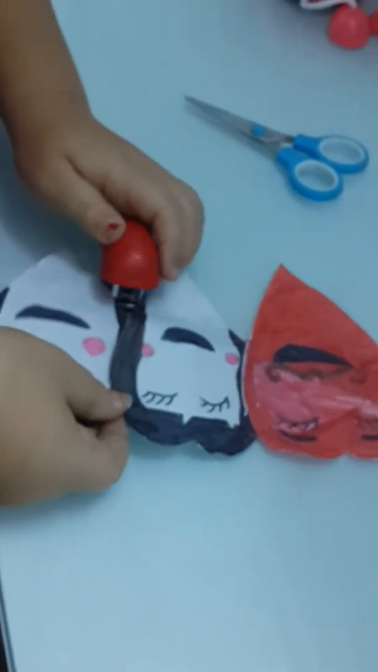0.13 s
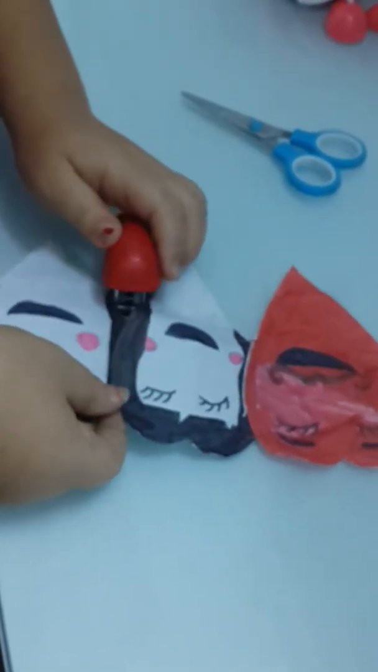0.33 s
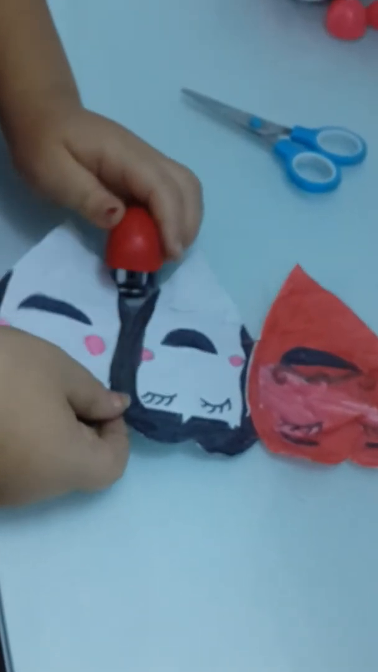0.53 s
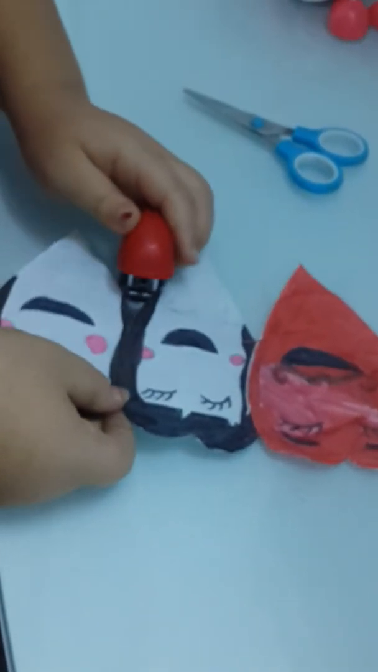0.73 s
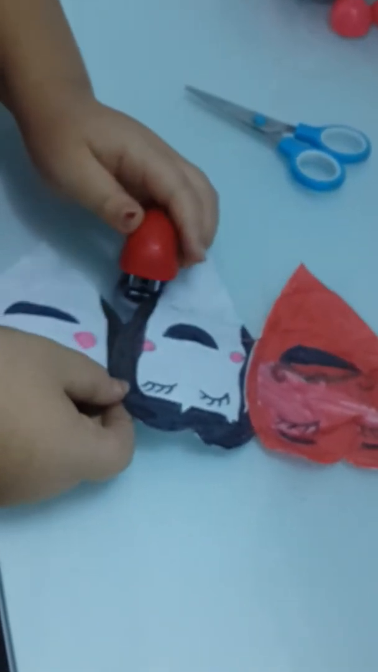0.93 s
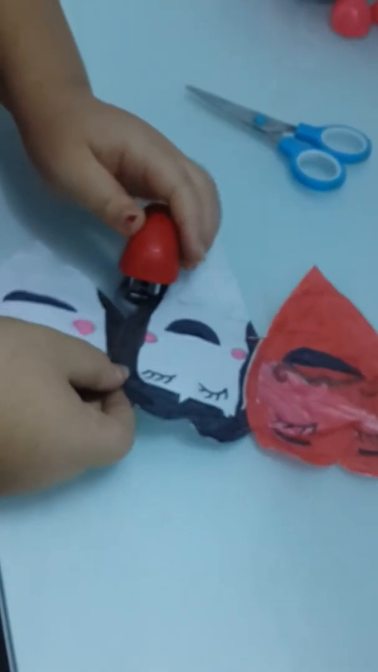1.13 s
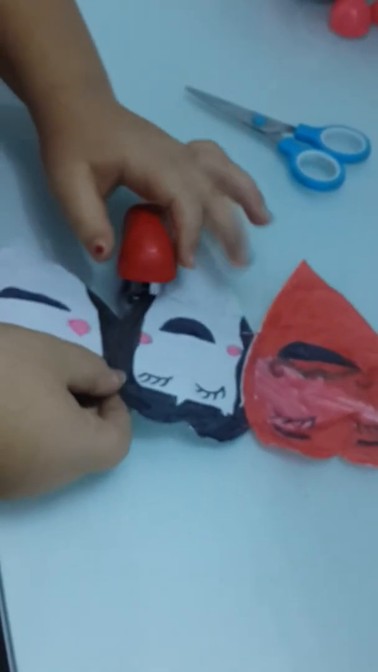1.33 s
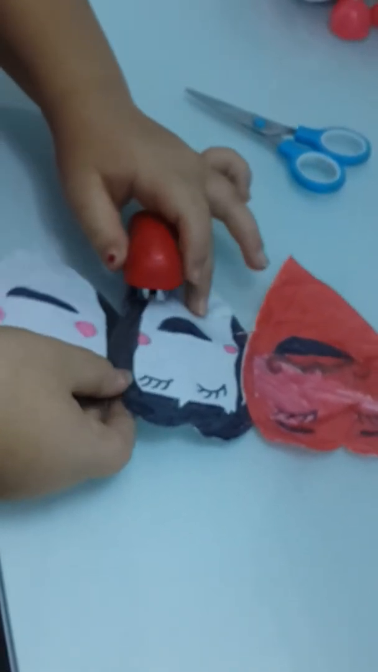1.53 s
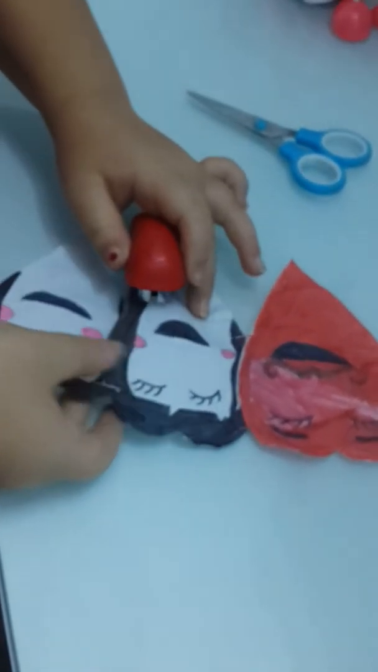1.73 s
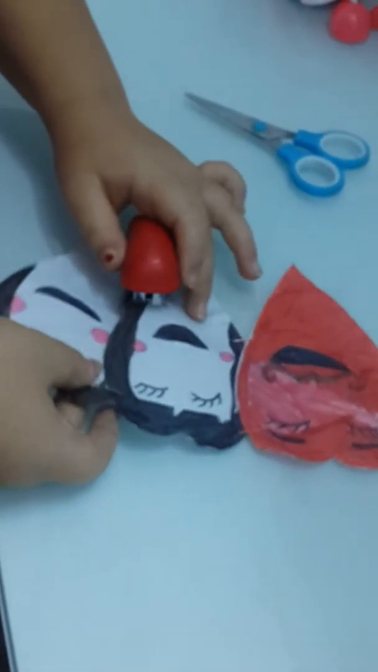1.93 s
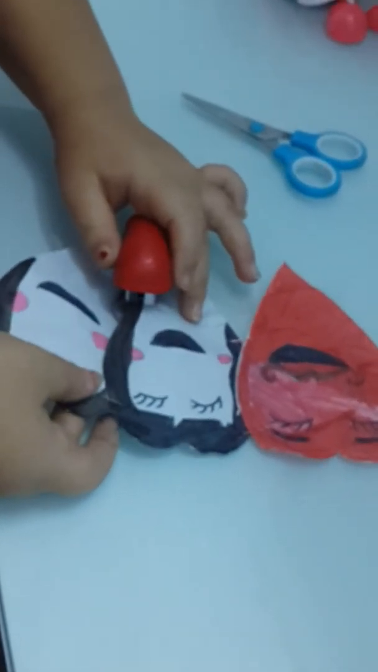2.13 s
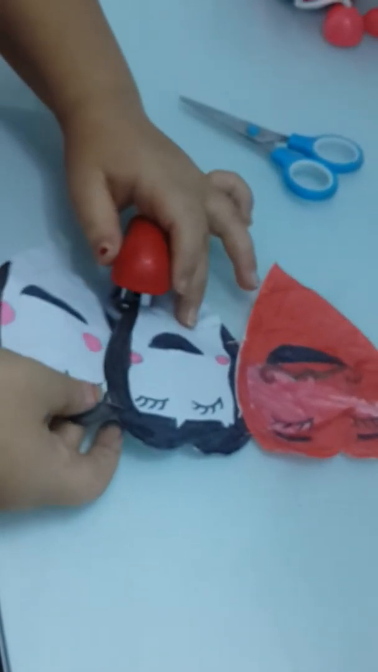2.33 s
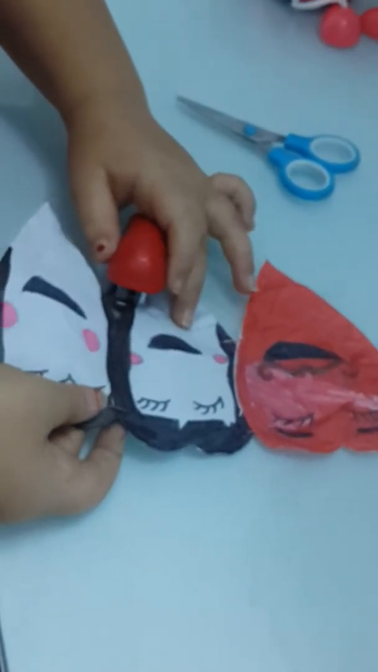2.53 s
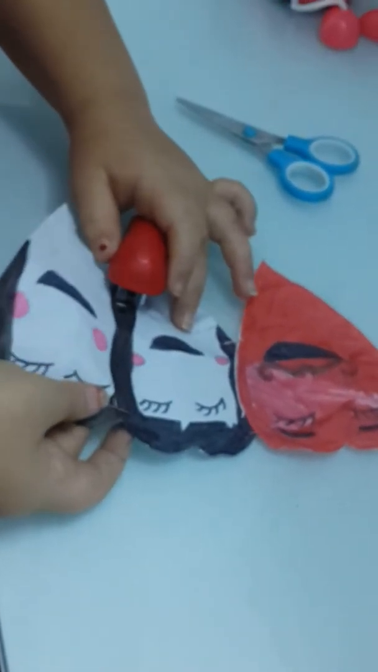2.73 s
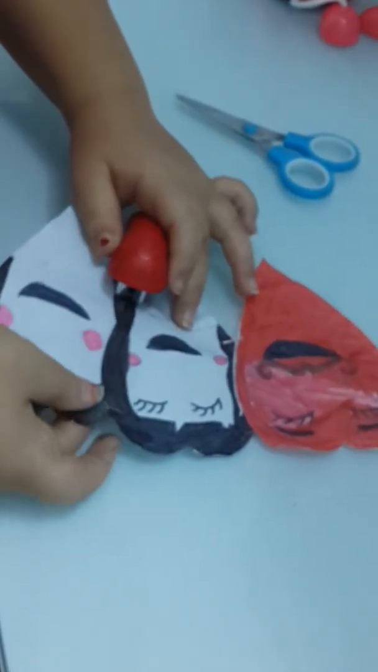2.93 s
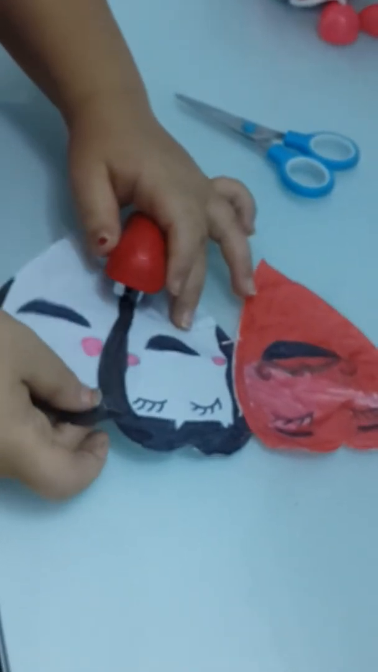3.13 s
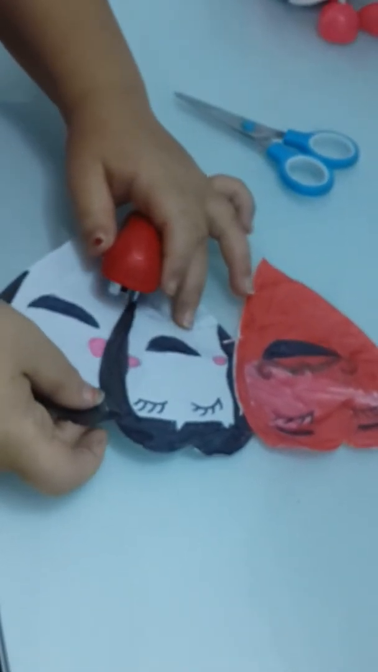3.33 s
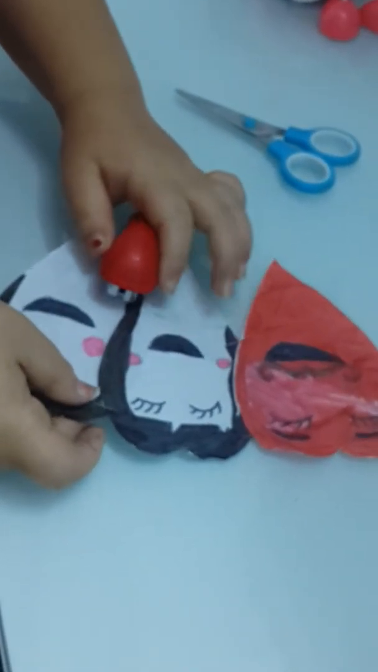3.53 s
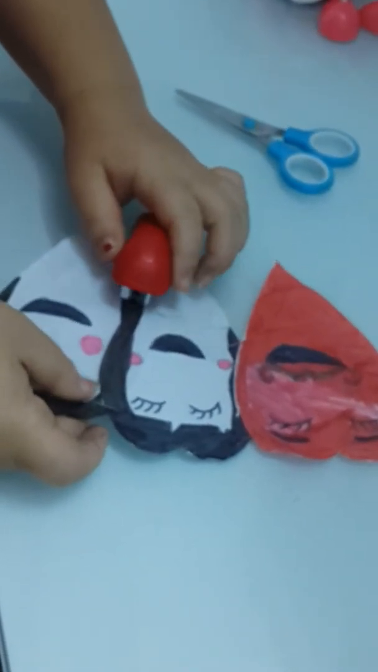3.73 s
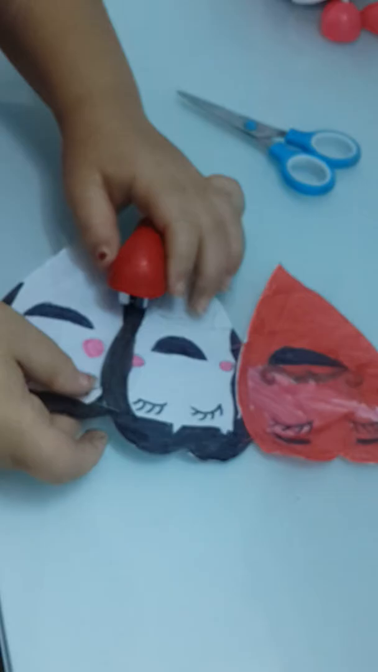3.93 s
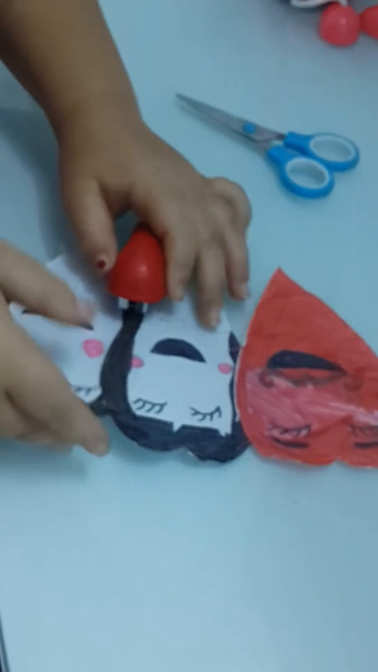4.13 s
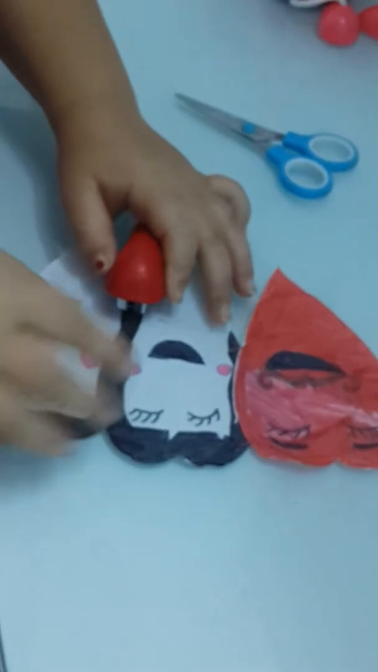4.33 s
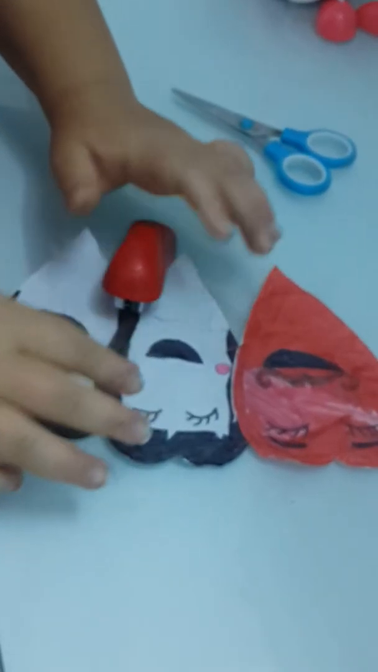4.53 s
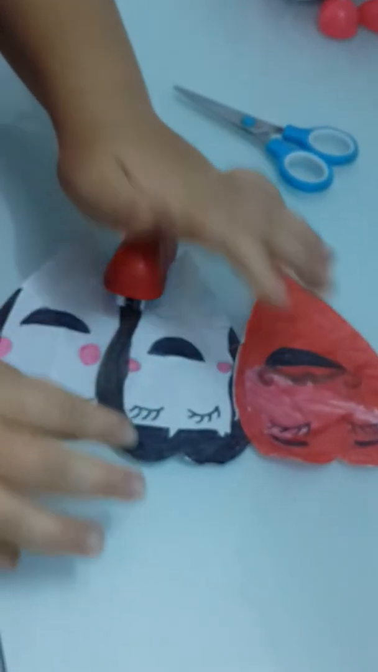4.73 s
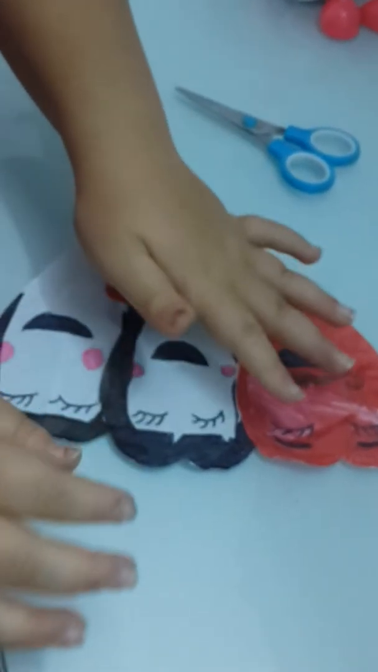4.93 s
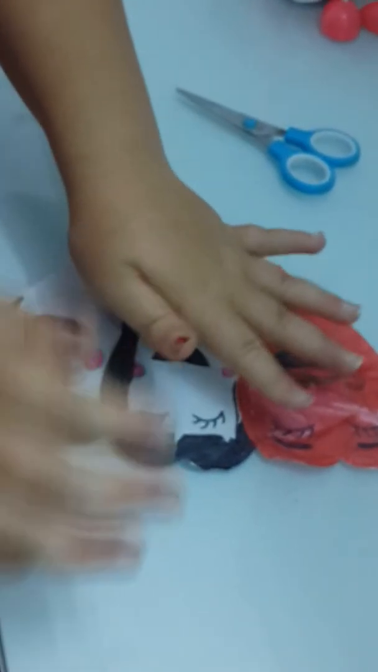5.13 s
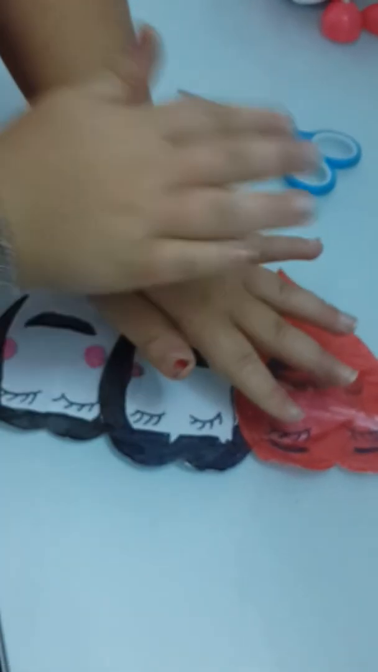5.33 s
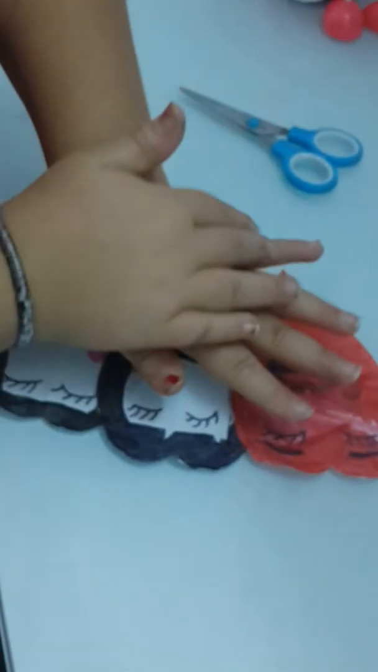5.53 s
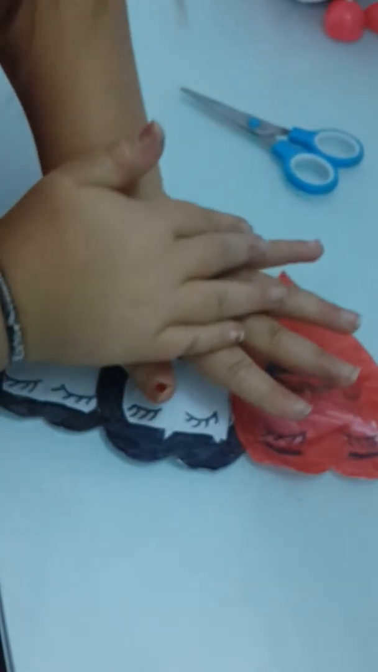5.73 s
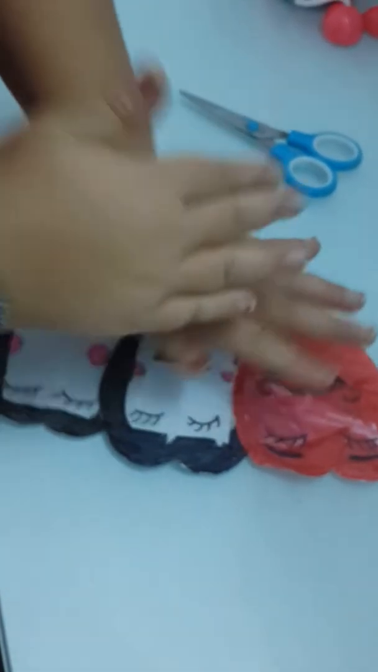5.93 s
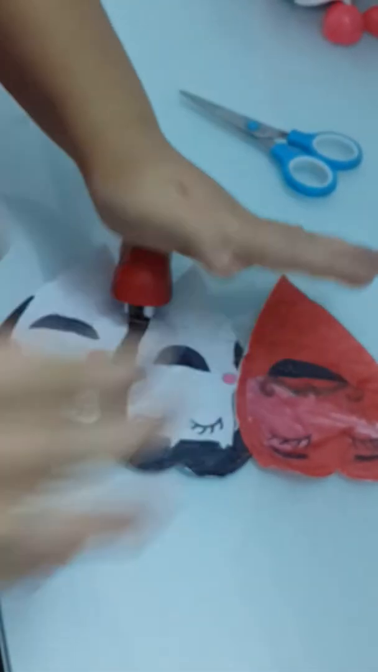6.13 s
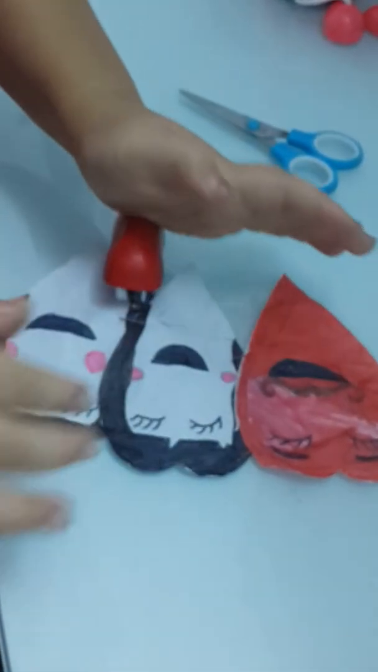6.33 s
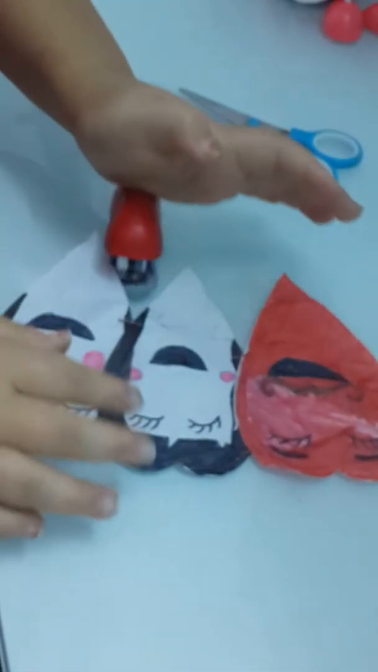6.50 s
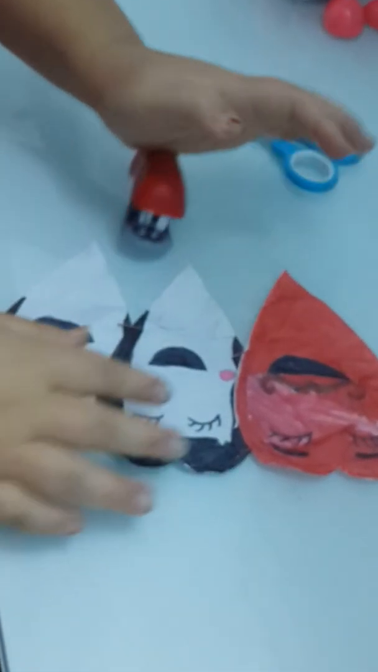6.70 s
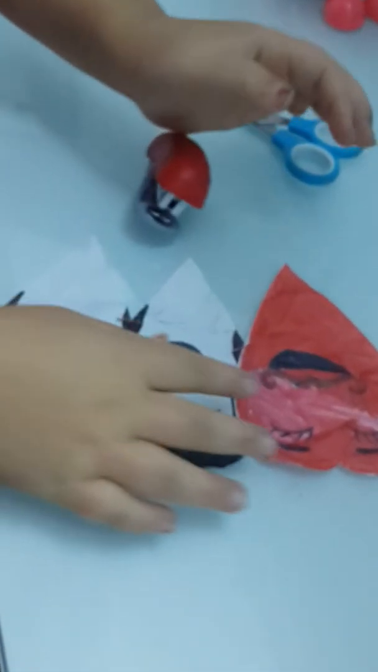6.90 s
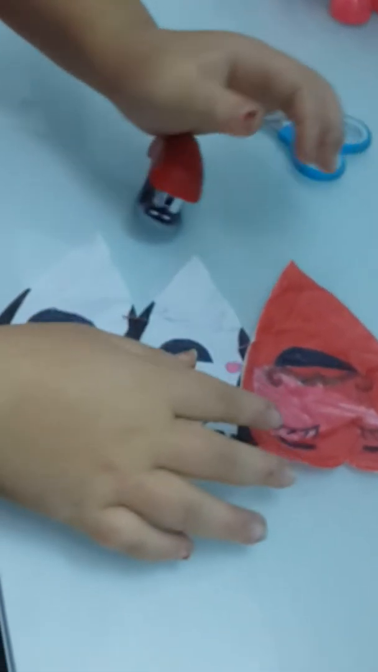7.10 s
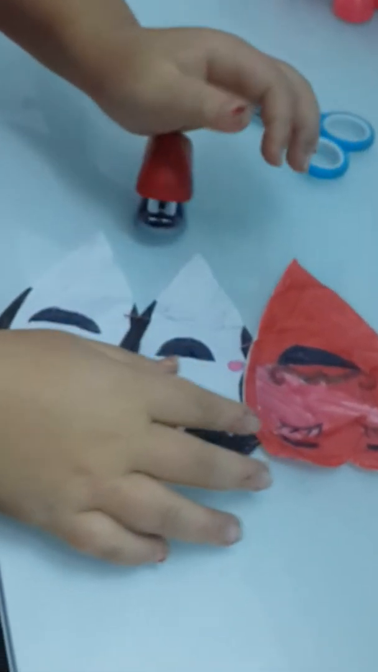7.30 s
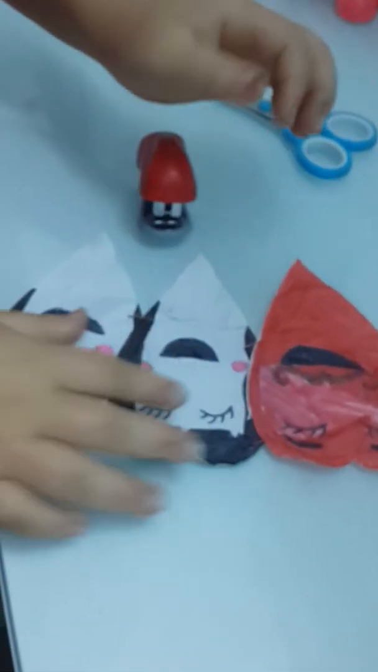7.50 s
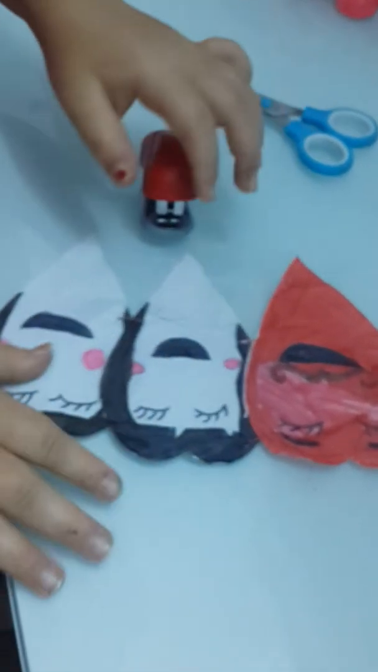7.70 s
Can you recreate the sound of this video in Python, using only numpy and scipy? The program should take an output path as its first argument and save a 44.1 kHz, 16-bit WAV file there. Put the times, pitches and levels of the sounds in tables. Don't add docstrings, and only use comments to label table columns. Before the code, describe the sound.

Close paper crackles and faint metal ticks in a bare room, one sharp two-part stapler clack, then a light rattling put-down.

```python
import sys
import numpy as np
from scipy import signal
from scipy.io import wavfile
from scipy.ndimage import uniform_filter1d

SR = 44100
rng = np.random.default_rng(int(sys.argv[2]) if len(sys.argv) > 2 else 0)


def unload_wav(signal):
    wavfile.write(
        sys.argv[1],
        SR,
        np.round(np.clip(np.atleast_2d(signal).T, -1, 1) * 32767).astype(np.int16),
    )


def level_to_linear(level):
    exponent = np.asarray(level, float) / 20
    return 10 ** exponent


N = 342229
OWN_SHARE = 0.55


def in_time(rows):
    s, *columns = np.transpose(rows)
    return [np.interp(np.arange(N) / SR, s, c) for c in columns]


def at_hz(points, hz, axis=1):
    points = np.array(points)
    return np.interp(np.log(hz), np.log(points[:, 0]), points[:, axis])


def drift(rate_hz, size=N):
    r = np.exp(-2 * np.pi * rate_hz * 40 / SR)
    white = rng.standard_normal(size // 40 + 2002)
    slow = signal.lfilter([1], [1, -2 * r, r * r], white)[2000:]
    return np.interp(np.arange(size) / 40, np.arange(len(slow)), slow / slow.std())


def band_filter(x, low_hz, high_hz, kind="band"):
    return signal.sosfilt(signal.butter(2, [low_hz, high_hz], kind, fs=SR, output="sos"), x)


def bands(white):
    # f/Hz, likeness/0-1
    likeness = [(60, 0.7), (250, 0.7), (500, 0.3), (1000, 0), (4000, 0), (14000, .0)]
    edges = 20 * 2 ** np.arange(0, 10.5, 0.5)
    for k, (low, high) in enumerate(zip(edges, edges[1:])):
        mid, side = band_filter(white[k % 2], low, high)
        centre = np.sqrt(low * high)
        alike = at_hz(likeness, centre)
        yield centre, np.sqrt(1 + alike) * mid + np.sqrt(1 - alike) * side * [[1], [-1]]


def resonate(force, hz, width_hz):
    r = np.exp(-np.pi * width_hz / SR)
    zeros = np.array([1, 0, -1]) * (1 - r * r) / 2
    return signal.lfilter(zeros, [1, -2 * r * np.cos(2 * np.pi * hz / SR), r * r], force)


def focus(noise, hz, spread, top_hz=16000):
    return band_filter(noise, hz / spread, min(hz * spread, top_hz, 18000))


def outside():
    # t/s, firing f/Hz, level/dB
    engine_path = [(0, 83.7, -66.5), (.7, 85.1, -76.5), (1.2, 80.56, -70), (1.7, 83.5, -62.5),
                   (2.1, 80, -74), (2.7, 75.1, -76), (3.3, 71.83, -69), (4.1, 69.7, -75.5),
                   (4.6, 71.25, -80), (5.2, 73.33, -70.5), (6.2, 69.06, -74), (7, 70.5, -74.5),
                   (7.76, 70, -80)]
    # multiple of firing f, level early/dB, level late/dB
    exhaust = [(2, -13, -7), (3, -5.5, -2), (4, -12, -11), (5, 8, -2), (6, -3.5, 2), (7, -45, -6),
               (8, -29.5, -30)]
    # t/s, f/Hz, level/dB
    drone_path = [(0, 115.1, -78), (.7, 116, -80), (1.3, 113, -69), (1.9, 112, -67), (2.5, 112.5, -75),
                  (3.3, 112.4, -75.5), (3.8, 111.4, -85), (7.76, 110, -82.5)]
    hz, level_db = in_time(engine_path)
    turn = 2 * np.pi * np.cumsum(hz * (1 + 0.003 * drift(3))) / SR
    late = np.clip((84 - hz) / 12, 0, 1)
    engine = np.zeros(N)
    for k, early_db, late_db in exhaust:
        partial_db = early_db + (late_db - early_db) * late + 4.5 * drift(5)
        engine += level_to_linear(partial_db) * np.sin(k * turn + 0.8 * drift(6))
    drone_hz, drone_db = in_time(drone_path)
    drone_turn = 2 * np.pi * np.cumsum(drone_hz) / SR
    drone = level_to_linear(drone_db + 2 * drift(0.95)) * np.sin(drone_turn + 0.5 * drift(5))
    return 0.83 * (level_to_linear(level_db) * engine * level_to_linear([[-0.7], [0.7]]) + drone)


def air():
    # f/Hz, density/dB per Hz
    colour = [(25, -26.5), (60, -10.5), (120, -10.5), (250, -7.5), (420, 1), (600, -14), (1000, -19),
              (2500, -19), (5000, -18.5), (10000, -27), (15000, -22)]
    # t/s, level/dB
    rumble = [(0.0, -62.5), (7.76, -71)]
    # t/s, level/dB
    hiss = [(0, -69.5), (3.7, -71.5), (4.3, -74), (4.6, -76.5), (5.0, -73.5), (5.3, -67), (5.95, -72.5),
            (6.1, -71.5), (7, -72.5), (7.76, -77)]
    (rumble_db,), (hiss_db,) = in_time(rumble), in_time(hiss)
    out = np.zeros((2, N))
    for hz, band in bands(rng.standard_normal((2, 2, N))):
        swell_db = rumble_db + 11.5 if hz < 700 else hiss_db + 23
        out += band * level_to_linear(at_hz(colour, hz) + swell_db + drift(2.1))
    return out


def rubs():
    # top t/s, length/s, level/dB,
    # centre f/Hz
    paper_strokes = [(0.027, 0.044, -47.5, 4800), (0.156, 0.034, -56, 6460), (0.23, 0.15, -61.5, 6000),
                     (0.389, 0.053, -60.5, 6230), (0.59, 0.024, -50.5, 7400), (0.843, 0.013, -50, 4700),
                     (1.167, 0.023, -37, 8560), (1.3, 0.048, -62, 7500), (1.388, 0.073, -45, 6330),
                     (1.338, 0.027, -53, 5070), (1.616, 0.026, -43, 7500), (1.664, 0.056, -44.5, 7000),
                     (1.694, 0.026, -32, 5960), (1.838, 0.18, -60, 6540), (2.008, 0.25, -65, 6300),
                     (2.134, 0.056, -55, 7300), (2.213, 0.12, -58, 5200), (2.381, 0.099, -58, 4760),
                     (2.505, 0.028, -59, 6600), (2.829, 0.053, -55.5, 5760), (2.944, 0.12, -55, 5730),
                     (2.986, 0.054, -48.5, 5560), (3.155, 0.028, -51, 5900), (3.21, 0.065, -42, 5500),
                     (3.301, 0.091, -45, 5440), (3.343, 0.017, -34.5, 6860), (3.315, 0.012, -51, 7000),
                     (3.416, 0.08, -45.5, 6800), (3.507, 0.053, -44, 7500), (3.603, 0.045, -51.5, 7970),
                     (3.749, 0.084, -59, 6466),
                     (3.904, 0.06, -62, 6100), (4.029, 0.019, -61.5, 7500), (4.145, 0.019, -51, 4870),
               (4.297, 0.14, -64, 5130), (4.596, 0.028, -60.5, 5170), (4.991, 0.03, -56, 4630),
               (5.188, 0.023, -42, 5400), (6.107, 0.16, -53, 5450), (6.172, 0.0091, -43, 5520),
               (6.236, 0.088, -60, 6586), (6.473, 0.051, -57.5, 6300), (6.5, 0.3, -66, 4960),
               (6.73, 0.1, -63.5, 5400), (7.117, 0.036, -54, 5180), (7.573, 0.046, -41, 5870),
               (6.15, .2, -60, 12000), (2.8, .03, -58, 12000), (6.734, .02, -60, 9000),
               (1.289, 0.038, -62, 9100), (1.204, 0.036, -57, 7500), (2.654, .03, -65, 5000)]
    # start, top and end t/s in any order, level/dB, centre f/Hz
    swishes = [
        (0, 1, 2.33, -66.5, 7500),
        (2.5, 3.096, 3.3, -69, 8100),
        (3, 2.96, 3.036, -49.5, 2500),
        (6, 5.2, 5.3, -62.5, 2410),
        (6.085, 6.13, 6.17, -55, 2750),
        (6.16, 6.19, 6.27, -52, 3250),
        (5.24, 5.35, 5.39, -57, 2400),
        (6.44, 6.47, 6.66, -61, 2500),
        (3.0, 3.1, 3.16, -61, 2300),
        (7, 6.797, 6.78, -64.5, 2330),
    ]
    # start, top and end t/s, level/dB, centre f/Hz
    edge_slides = [
        (6.47, 6.56, 6.66, -62, 5200),
        (6.03, 6.06, 6.12, -64, 5300),
    ]
    catching = rng.random(N) < 0.03
    jumps_db = np.minimum(rng.exponential(1, N), 2) * catching
    grains = rng.standard_normal((2, N)) * level_to_linear(1.7 * jumps_db + 3.1 * drift(60))
    grains = grains[0] + 0.6 * grains[1] * [[1], [-1]]
    rise = 0.55
    short = [(top - rise * long, top, top + (1 - rise) * long, db, hz) for top, long, db, hz in paper_strokes]
    wide = short + swishes
    out = np.zeros((2, N))
    for k, (start, top, end, level_db, hz) in enumerate(wide + edge_slides):
        start, top, end = np.sort([start, top, end])
        times = [start - min(top - start, 0.02), start, top, end, end + 0.015]
        span = slice(max(round(times[0] * SR), 0), round(times[-1] * SR))
        shape_db = np.interp(np.arange(N)[span] / SR, times, [-36, -8, 0.5, -14.5, -36.5])
        spread = 1.17 if hz < 3400 or k >= len(wide) else 1.8
        out[:, span] += level_to_linear(level_db + shape_db + 2.5) * focus(grains[:, span], hz, spread)
    return out


def snaps():
    # t/s, peak/dB, centre f/Hz, t60/ms
    stroke = [(5.388, -38, 5007, 30), (5.3915, -19, 6500, 14), (5.3937, -8, 6150, 6.7),
              (5.3979, -17.5, 7050, 17), (5.532, -53.5, 8000, 9.4), (5.545, -50.5, 8000, 7.7),
              (5.563, -37, 6030, 65), (5.576, -42.5, 6006, 36), (5.586, -37, 7000, 68),
              (5.589, -27.5, 7020, 30), (5.5898, -20, 5970, 75), (5.596, -23, 3000, 40),
              (5.5989, -9.5, 5190, 9), (5.601, -13, 5490, 26), (5.609, -15, 5730, 15),
              (5.611, -19, 5490, 40), (5.6378, -31, 7010, 12), (5.6391, 0, 7192, 4),
              (5.6384, -24.5, 5980, 30), (5.6427, -0.5, 7190, 6.1), (5.6474, -18.5, 7500, 20),
              (5.6445, -10, 7010, 25)]
    # t/s, peak/dB, centre f/Hz, t60/ms
    ticks = [(0.811, -23.5, 5000, 30), (1.328, -46, 1900, 90), (1.372, -27.5, 7450, 5.4),
             (1.3757, -34, 6500, 40), (1.3816, -31, 7500, 26), (1.3898, -36, 6000, 41),
             (5.154, -52.5, 4470, 43), (5.1792, -33, 3280, 2), (5.183, -33, 7480, 25),
             (6.1662, -28, 4700, 18), (7.098, -38.5, 5900, 38), (7.504, -67, 4970, 30),
             (7.5255, -25, 7500, 19), (7.5311, -38, 6500, 31), (7.547, -26, 7500, 17),
             (7.551, -35, 7000, 34), (7.5598, -31.5, 8000, 32), (7.5694, -36.5, 7500, 28),
             (7.5768, -33.5, 7500, 21), (7.583, -45, 7500, 44), (1.35, -46, 8500, 5), (1.359, -57, 7030, 5),
             (1.359, -47, 6500, 5), (1.365, -46, 8500, 20), (2.8584, -40.5, 8000, 7.1),
             (2.601, -53, 2820, 12), (2.644, -57, 5000, 8), (1.161, -45, 2860, 8), (2.498, -51, 5020, 25)]
    # t/s, peak/dB, centre f/Hz, left-right/dB
    paper_snaps = [(0.0188, -43, 4860, -4), (0.1326, -39, 6340, -1), (0.148, -36, 6600, -5),
                   (0.219, -44.5, 6100, 9), (0.2745, -44, 7500, -11), (0.2966, -51, 4900, -6),
                   (0.5716, -50, 7000, -10), (0.573, -41.5, 7100, -12), (0.585, -31.5, 7900, -22),
                   (0.6052, -49, 5570, 10), (0.6015, -44, 6000, 5), (0.616, -43, 6290, 1),
                   (0.748, -53.5, 4690, 6), (1.0278, -46, 9210, -10), (1.161, -29, 8450, -17),
                   (1.1672, -38.5, 6950, -23), (1.198, -48, 6700, -13), (1.268, -48, 9500, -11),
                   (1.644, -36, 5530, -11), (1.646, -25.5, 7500, -3), (1.6727, -33, 5500, -7),
                   (1.6806, -30, 6500, 0), (1.6877, -23.5, 7500, -7), (1.6882, -23.5, 5540, -4),
                   (1.6953, -21.5, 5400, -13), (1.6961, -24, 6540, -13), (1.8571, -59, 3900, -5),
                   (2.0011, -46, 6180, -8), (2.1054, -43.5, 7700, -1), (2.1402, -41, 8300, -15),
                   (2.1817, -43.5, 5000, 3), (2.1984, -41, 7510, 3),
                   (2.328, -50, 8240, -2.0), (2.3534, -45, 6142, 2), (2.383, -48.5, 4800, -4),
                  (2.4992, -44.5, 7500, -7), (2.601, -38, 7300, -7), (2.7834, -41, 5600, 11),
                  (2.826, -48, 6400, -4), (2.8587, -42, 2800, 2), (2.9501, -41, 6200, 3),
                  (2.98, -38.5, 7240, -3), (3.0014, -42, 7210, 0), (3.04, -46.5, 6290, 10),
                  (3.1485, -36.5, 6200, 0), (3.1765, -48, 7000, -3), (3.1825, -39, 4330, 4),
                  (3.1877, -36, 5000, -0.5), (3.1951, -31.5, 7500, -4), (3.259, -39, 5370, -1),
                  (3.3275, -30.5, 7100, 2), (3.333, -34, 8000, -6.0), (3.338, -35, 6500, -9),
                  (3.3436, -33, 7700, -3), (3.424, -42.5, 7840, -18), (3.484, -43, 9820, -18),
                  (3.497, -41, 8110, -9), (3.6089, -35, 8230, -2), (4.1387, -42.5, 4000, -5),
                  (4.591, -58, 3770, 0), (4.984, -47.5, 5810, -2), (6.101, -46, 6710, -4),
                  (6.2317, -48, 6290, -6), (6.715, -50.5, 8620, -1)]
    steel = [(*row, -2, 2.16) for row in stroke + ticks]
    paper = [(s, db, hz, 5.8, pan_db + 0.5, 1.77) for s, db, hz, pan_db in paper_snaps]
    rows, size = steel + paper, 2048
    close, to_walls = np.zeros((2, N + size)), np.zeros((3, N + size))
    t = np.arange(size) / SR
    for k, (s, peak_db, hz, t60_ms, pan_db, spread) in enumerate(rows):
        mid, side = rng.standard_normal((2, size))
        first = round(s * SR)
        top_hz = 12000 if k < len(stroke) else 16000
        shape = (1 - np.exp(-t / 0.0004)) * level_to_linear(-60 * t / (t60_ms / 1000))
        burst = focus(shape * (mid + OWN_SHARE * side * [[1], [-1]]), hz, spread, top_hz)
        burst *= level_to_linear(peak_db) / np.sqrt(uniform_filter1d(burst.mean(axis=0) ** 2, size=36).max())
        sides = level_to_linear(np.clip(pan_db, -12, 12) * np.array([[0.5], [-0.5]]))
        close[:, first:first + size] += burst * sides / sides.mean()
        hump = focus(1.0 * (t == 0), hz, 1.195 * spread, top_hz)
        energy = np.sum(burst.mean(axis=0) ** 2)
        to_walls[k % 3, first:first + size] += hump * np.sqrt(energy / np.sum(hump ** 2))
    return close[:, :N], to_walls[:, None, :N]


def knocks():
    # t/s, level/dB, rattle t60/ms
    hits = [(.02, -56.5, 46), (0.811, -41.5, 65), (1.327, -57, 116), (1.371, -39, 112), (1.385, -42, 49),
            (1.69, -51, 48), (2.19, -59.5, 34), (2.355, -58.5, 26), (2.961, -63, 290), (3.186, -55.5, 51),
            (3.896, -65.5, 61), (4.315, -62.5, 50), (4.984, -57.5, 35), (5.1746, -46, 33),
            (5.3919, -33, 77), (5.564, -46.5, 79), (5.591, -30.5, 81), (5.639, -36.5, 20),
            (6.166, -53.5, 38.7), (7.096, -50, 120), (7.372, -70.5, 45), (7.525, -39.5, 57),
            (7.547, -41.5, 70), (7.561, -43, 78), (7.576, -44, 53)]
    # f/Hz, width/Hz, level/dB
    modes = [(276, 83, -2), (401.7, 124, 0.5), (501.5, 280, -3.5), (885, 200, 0), (1150, 360, -4.5),
             (1620, 190, -14.5), (1766, 260, -8.5), (2250, 600, -7.5), (3000, 250, -17.5)]
    size = 8192
    rattle, t = np.zeros((2, N + size)), np.arange(size) / SR
    for s, level_db, t60_ms in hits:
        push = rng.standard_normal((2, size)) * level_to_linear(level_db - 60 * t / (t60_ms / 1000))
        push[0, 0] = level_to_linear(level_db + 10.5)
        first = round(s * SR)
        rattle[:, first:first + size] += push[0] + OWN_SHARE / 2 * push[1] * [[1], [-1]]
    out = np.zeros((2, N))
    for k, (hz, width_hz, db) in enumerate(modes):
        out += (-1) ** k * level_to_linear(db + 19) * resonate(rattle[:, :N], hz, width_hz)
    return out


def room(x):
    # f/Hz, t60/s, level/dB
    decay = [(80, 0.44, -21.5), (258.5, 0.58, -21.5), (600, 0.45, -16), (1500, 0.48, -20),
             (3504, 0.42, -19.5), (7500, 0.42, -26), (11300, 0.67, -33.5), (14050, .25, -40)]
    size, build_up_s = SR // 2, 0.0098
    t = np.arange(size) / SR
    tail = np.zeros((2, size))
    for hz, band in bands(rng.standard_normal((2, 2, size))):
        level_db = at_hz(decay, hz, axis=2) - 20 - 60 * t / at_hz(decay, hz)
        tail += band * level_to_linear(level_db + 2.2 * drift(40, size))
    tail *= 1 - np.exp(-(t / build_up_s) ** 2)
    return signal.fftconvolve(x.mean(axis=0, keepdims=True), tail, axes=1)[:, :N]


def ringing():
    # t/s, f/Hz, level/dB, t60/s
    rings = [(5.65, 3550, -44, .5), (5.393, 3100, -47.5, .2), (5.645, 4400, -54.5, .15),
             (7.549, 4100, -53, 0.55), (7.528, 3010, -56, 1.1), (7.1, 3010, -64, .5),
             (5.392, 87, -55.5, 0.57), (5.392, 91, -50.5, 1), (5.392, 130, -47, 0.6),
             (5.391, 310, -47.5, 0.3), (5.596, 106, -53.5, 0.75), (5.392, 230, -52, 0.43),
             (5.392, 250, -45, 0.27), (1.38, 420, -49.5, 0.39), (1.38, 490, -52.5, .15),
             (5.3911, 2380, -13, 0.018), (5.3935, 5440, -13, 0.01), (5.3934, 7800, -14, .018),
              (5.5977, 2500, -21, 0.059), (5.599, 5580, -8.5, 0.01), (5.6098, 5830, -13, .012),
              (5.65, 1660, -41, .35), (5.65, 7840, -48, .3), (5.65, 6310, -50.5, .3),
              (7.5258, 10600, -29, .02), (7.5472, 10100, -30, .025), (7.562, 10000, -30, .03),
              (7.57, 10200, -44, .02), (7.576, 10300, -42, .02), (1.372, 9700, -26, 0.016),
              (3.897, 295, -57.5, 0.095), (3.897, 880, -65, 0.12), (3.897, 3700, -66, .04),
              (4.138, 3800, -49, 0.046), (4.143, 3000, -62, .05), (4.315, 350, -59, 0.085),
              (4.314, 1600, -72, 0.053), (4.59, 3700, -61, 0.059), (4.59, 1620, -74.5, .2),
              (1.372, 1180, -46, 0.05), (1.372, 305, -48, 0.25), (7.526, 960, -48, 0.1),
              (7.548, 890, -51, 0.043), (2.8585, 2200, -41.5, .012), (2.857, 2900, -50, .012),
              (2.8588, 4520, -48, .015), (5.5, 66, -62, .6), (5.45, 304, -48, 0.28),
              (7.549, 3030, -50, .12), (7.097, 900, -55, .08), (.822, 420, -54, .1), (.813, 880, -46, .06),
              (7.53, 215, -56, 0.57), (7.53, 560, -48, .12), (7.097, 1250, -60, .06), (5.6, 560, -42, .15),
              (5.643, 1450, -32, .06), (7.528, 90, -67, 0.38), (.812, 1200, -42.5, 0.054),
              (.812, 2280, -46, .03), (0.82, 2970, -43, 0.05), (5.18, 1150, -53, 0.07),
              (6.167, 2980, -35, 0.025), (7.53, 131, -59, 0.43)]
    out = np.zeros(N)
    for s, hz, level_db, t60 in rings:
        first = round(s * SR)
        size = min(N - first, SR, round(t60 * SR))
        t = np.arange(size) / SR
        pair = np.sin(2 * np.pi * hz * t) + 0.53 * np.sin(2 * np.pi * hz * 1.012 * t)
        waver_db = 2.5 * drift(7.1, size=SR)[:size]
        onset = np.minimum(t * hz, 1)
        out[first:first + size] += level_to_linear(level_db - 60 * t / t60 + waver_db) * onset * pair
    return out


def squeak():
    # t/s, level/dB, f/Hz
    glide = [
        (5.22, -74, 2666),
        (5.3, -63, 2720),
        (5.385, -63, 2720),
        (5.41, -41.5, 2800),
        (5.47, -41.5, 2780),
        (5.53, -47.5, 2826),
        (5.57, -54, 2860),
    ]
    span = slice(round(glide[0][0] * SR), round(glide[-1][0] * SR))
    level_db, hz = (curve[span] for curve in in_time(glide))
    low_pass = signal.butter(2, 130, fs=SR, output="sos")
    flutter = signal.sosfilt(low_pass, rng.standard_normal((2, SR)))[:, :len(hz)]
    turn = 2 * np.pi * np.cumsum(hz) / SR
    tone = flutter[0] * np.sin(turn) + flutter[1] * np.cos(turn)
    out = np.zeros(N)
    out[span] = level_to_linear(level_db - 3) * tone / flutter.std()
    return out


def ports(near):
    left, right = near
    shade = 0.7 * resonate(left, 9000, 2300) + 0.39 * resonate(left, 13500, 5000)
    shade += 0.22 * resonate(left, 2300, 2600)
    late_right = np.interp(np.arange(N) - 2, np.arange(N), right)
    return np.array([left - shade, late_right])


def set_aside_dip(hands):
    # from t/s, f/Hz, width/Hz, share/0-1
    thin_band = (7.5, 4850, 1200, .93)
    from_s, hz, width_hz, share = thin_band
    thinned = band_filter(hands, hz - width_hz / 2, hz + width_hz / 2, "bandstop")
    return np.where(np.arange(N) > from_s * SR, share * thinned + (1 - share) * hands, hands)


def ducking():
    # start t/s, attack/s, hold/s, release/s, depth/dB
    ducks = [
        (5.59, 0.018, 0.06, 0.011, -4),
        (5.62, .005, .014, .002, -6.5),
        (5.683, .13, 0.13, 0.054, -3.5),
    ]
    gain_db = np.ones(N)
    for *steps, depth_db in ducks:
        gain_db += np.interp(np.arange(N) / SR, np.cumsum(steps), [0, depth_db, depth_db, 0])
    return gain_db


def scene():
    rubbed, knocked = rubs(), knocks()
    snapped, to_walls = snaps()
    near = band_filter(snapped + knocked + rubbed, 150, 11000) + ringing() + squeak()
    wet = room(to_walls[0] + 1.234 * knocked + 0.43 * rubbed) + room(to_walls[1]) + room(to_walls[2])
    hands = set_aside_dip(ports(near) + wet)
    hands -= 0.5 * resonate(hands, 11700, 1500)
    return hands + outside() + air()


def band_limit(x):
    return signal.sosfilt(signal.butter(12, 16600, fs=SR, output="sos"), x)


def record(dry):
    coloured = dry - 0.47 * resonate(dry, 3500, 4400)
    top_cut = signal.cheby2(8, 25, 15900, fs=SR, output="sos")
    level = signal.sosfilt(top_cut, coloured) * level_to_linear(ducking())
    ceiling = 0.9
    mix = ceiling * np.tanh(level / ceiling)
    return band_limit(mix)


dry = scene()
out = record(dry)
unload_wav(out)
```